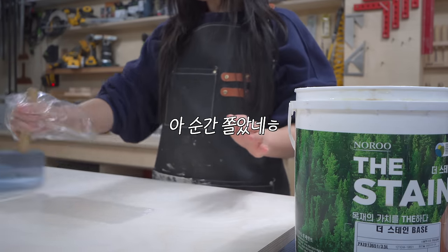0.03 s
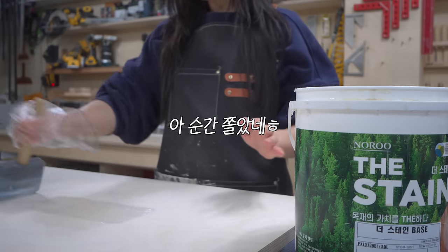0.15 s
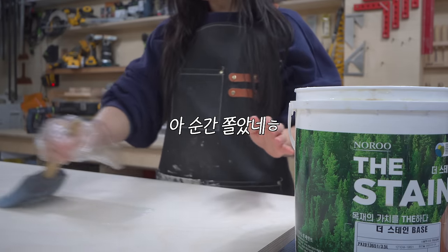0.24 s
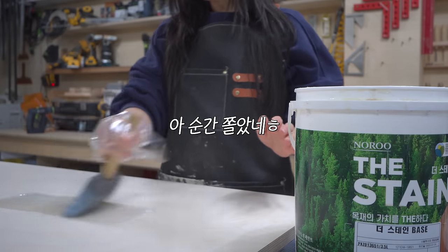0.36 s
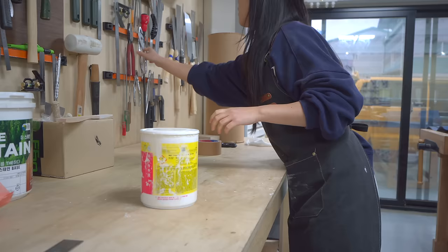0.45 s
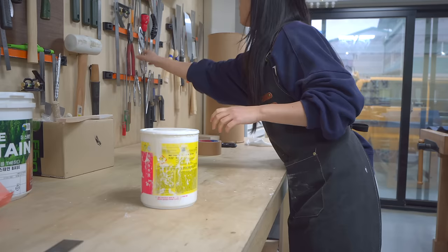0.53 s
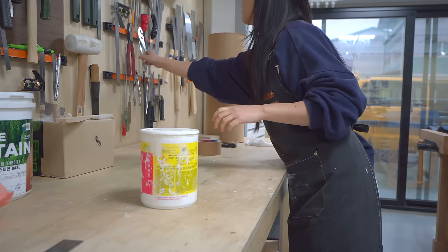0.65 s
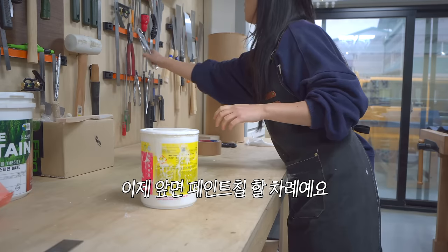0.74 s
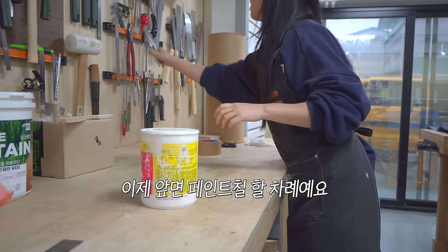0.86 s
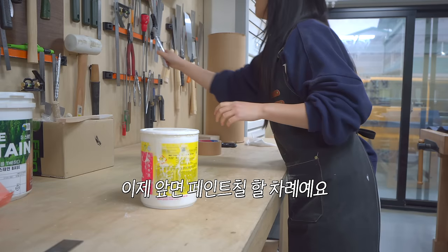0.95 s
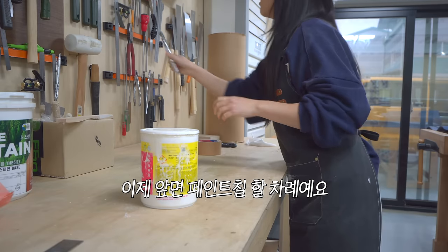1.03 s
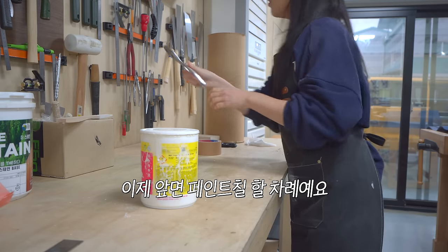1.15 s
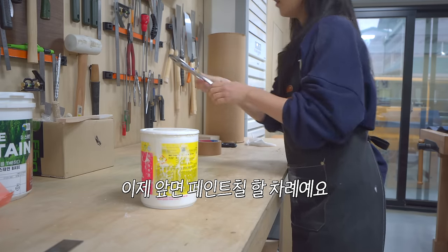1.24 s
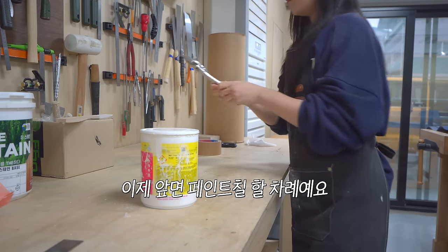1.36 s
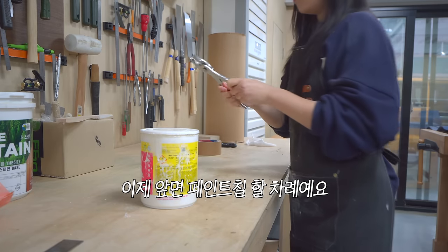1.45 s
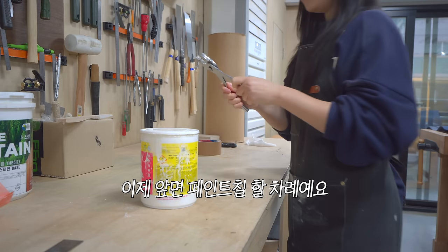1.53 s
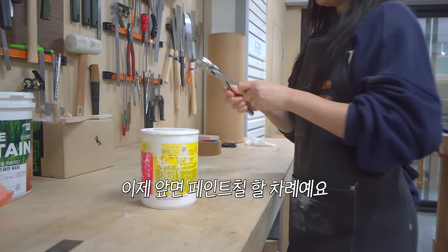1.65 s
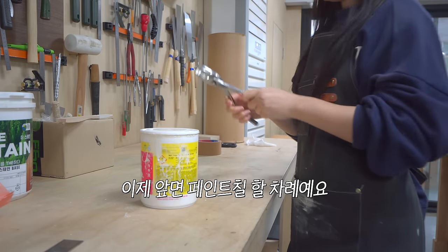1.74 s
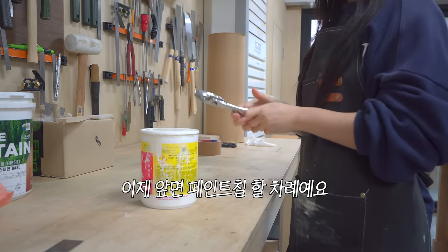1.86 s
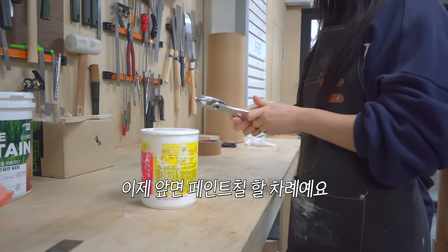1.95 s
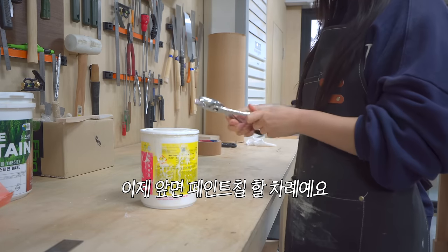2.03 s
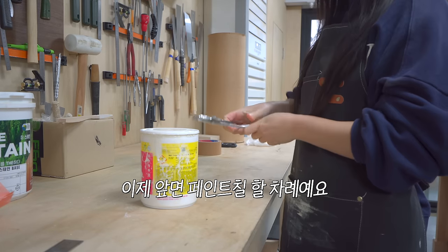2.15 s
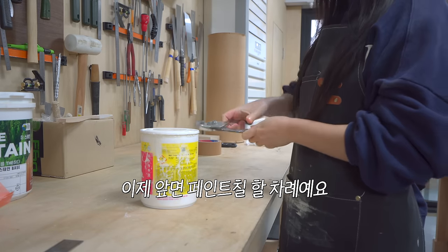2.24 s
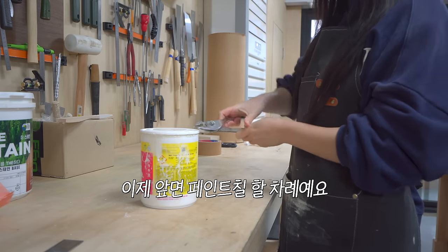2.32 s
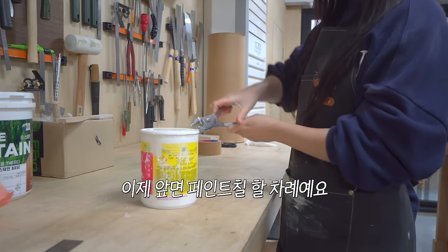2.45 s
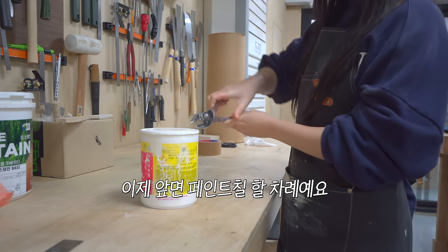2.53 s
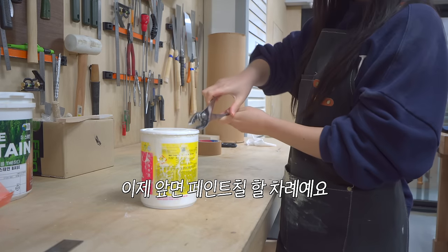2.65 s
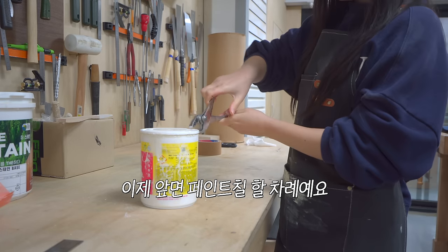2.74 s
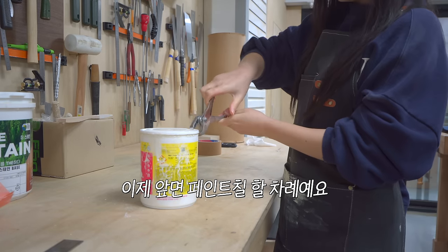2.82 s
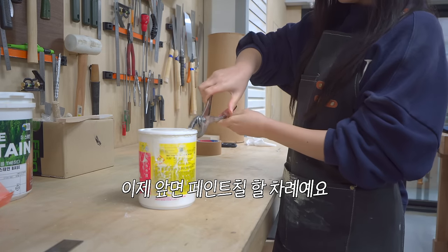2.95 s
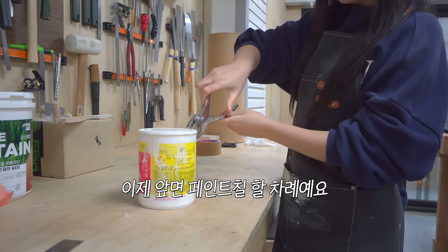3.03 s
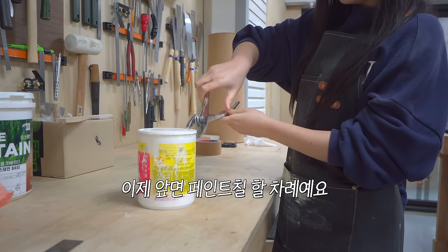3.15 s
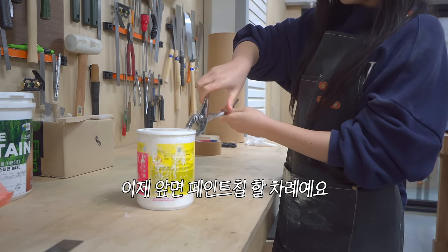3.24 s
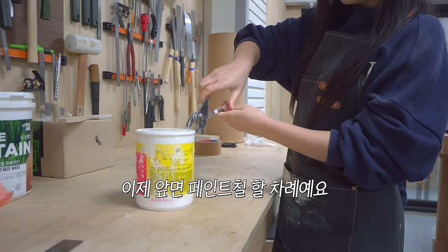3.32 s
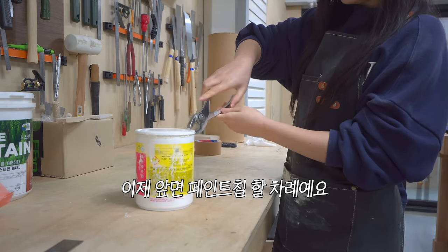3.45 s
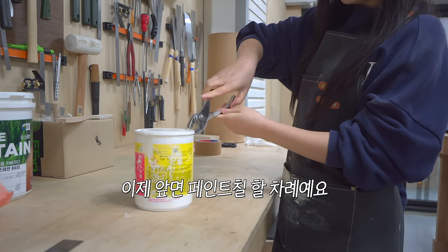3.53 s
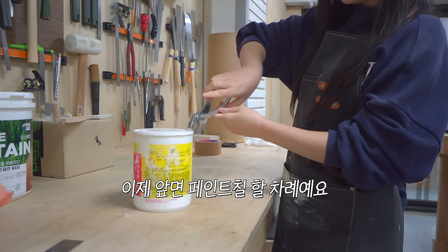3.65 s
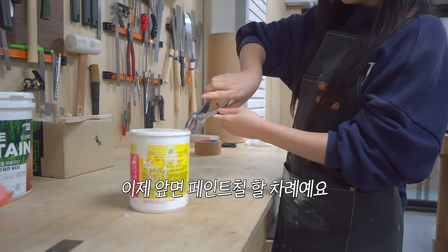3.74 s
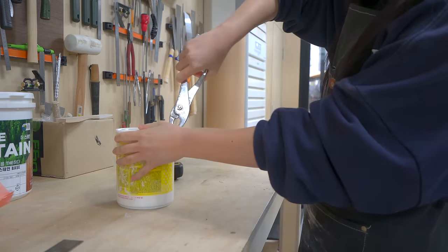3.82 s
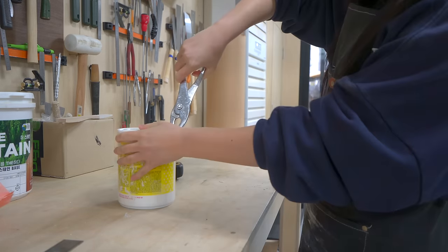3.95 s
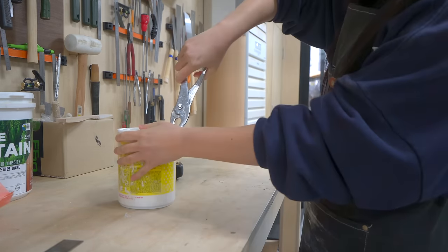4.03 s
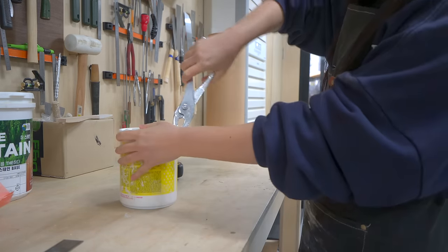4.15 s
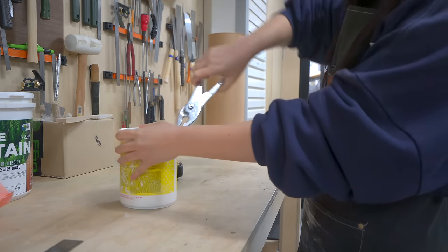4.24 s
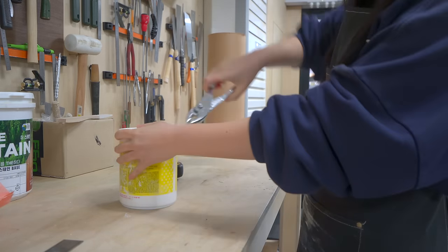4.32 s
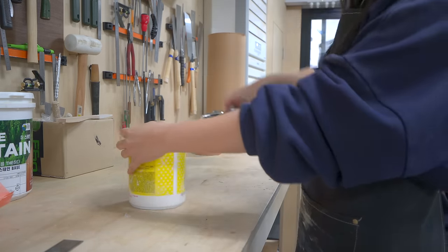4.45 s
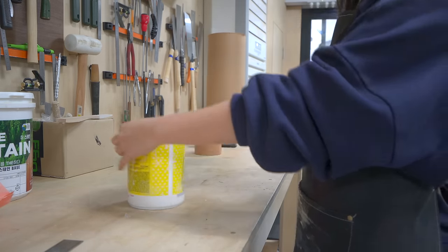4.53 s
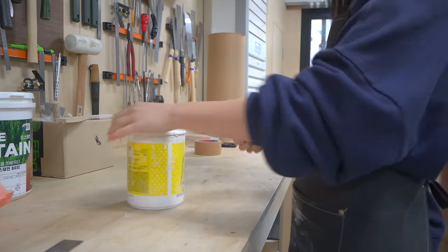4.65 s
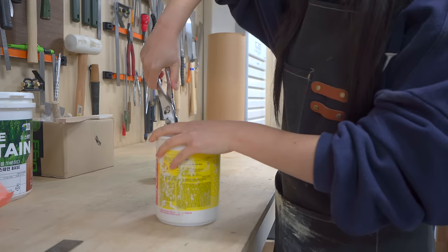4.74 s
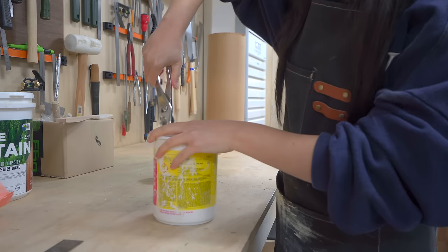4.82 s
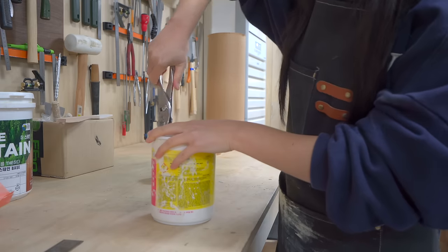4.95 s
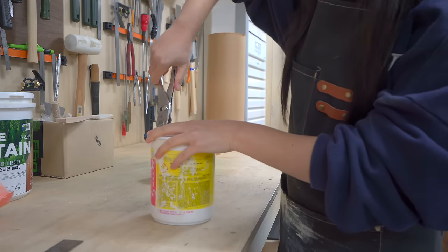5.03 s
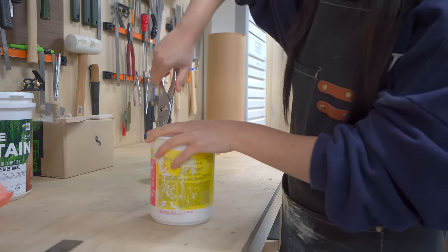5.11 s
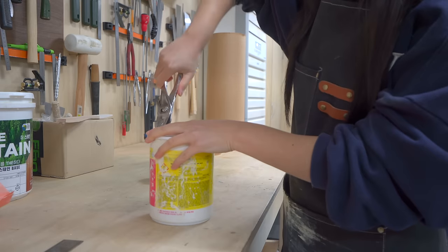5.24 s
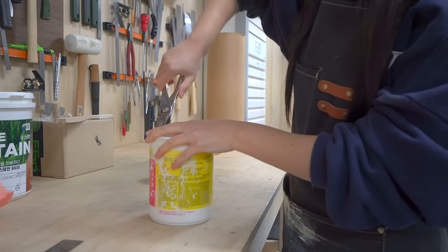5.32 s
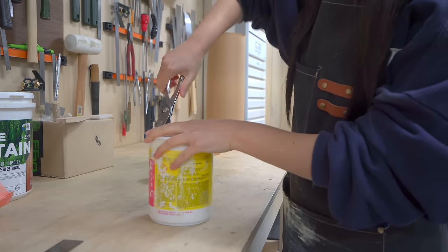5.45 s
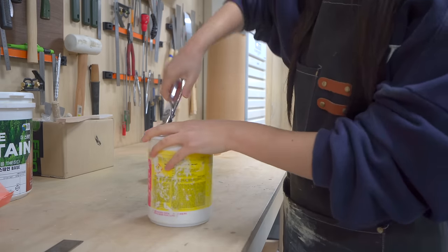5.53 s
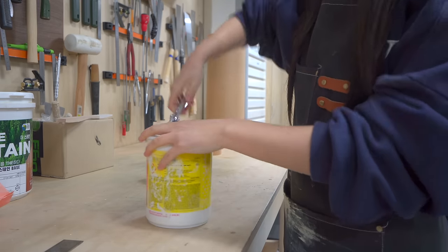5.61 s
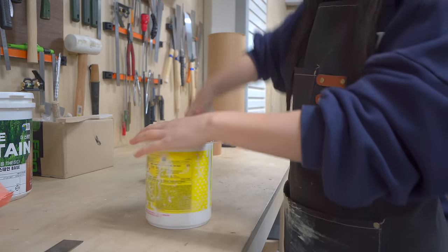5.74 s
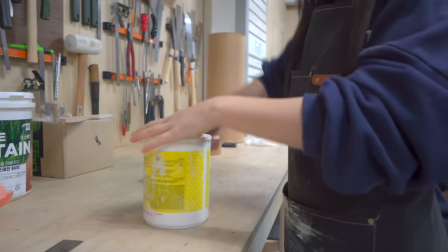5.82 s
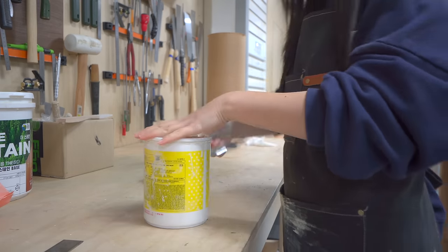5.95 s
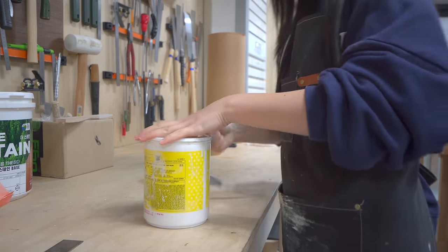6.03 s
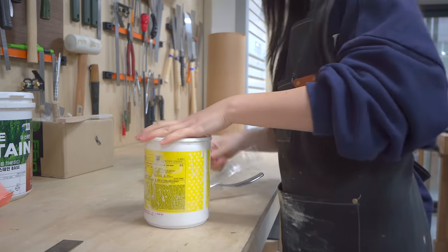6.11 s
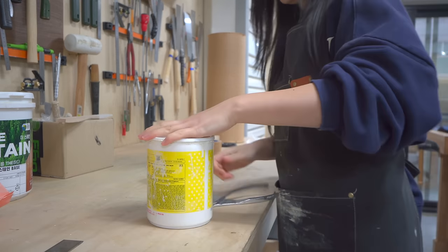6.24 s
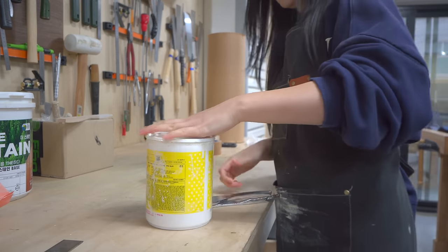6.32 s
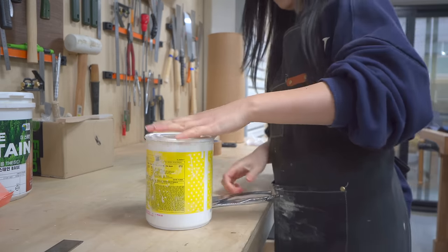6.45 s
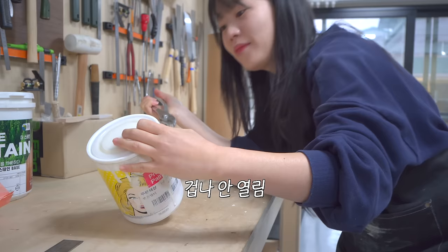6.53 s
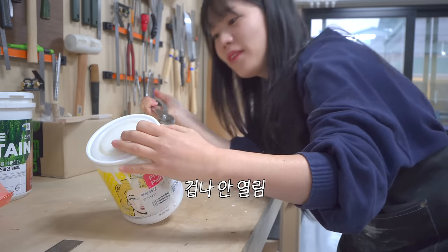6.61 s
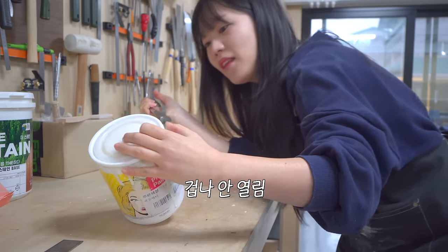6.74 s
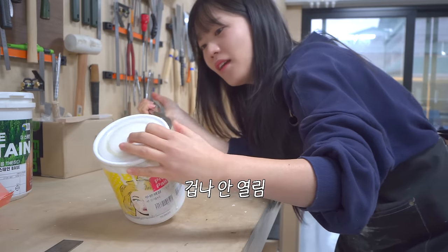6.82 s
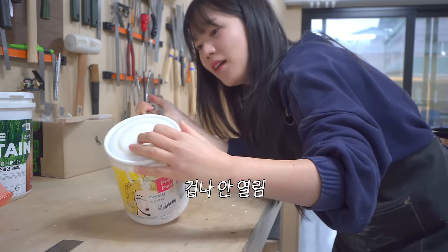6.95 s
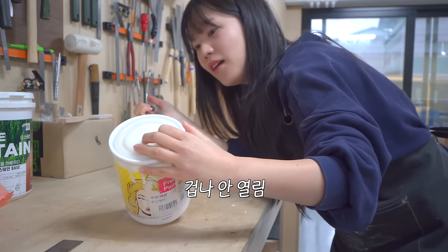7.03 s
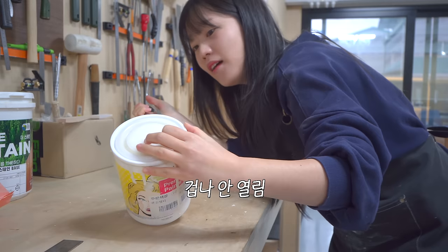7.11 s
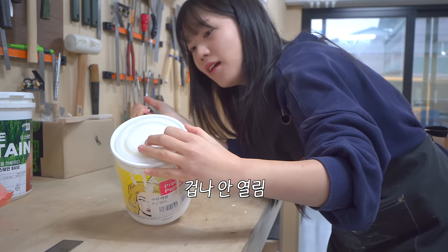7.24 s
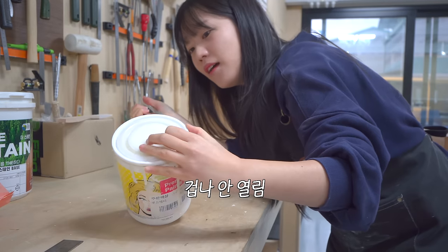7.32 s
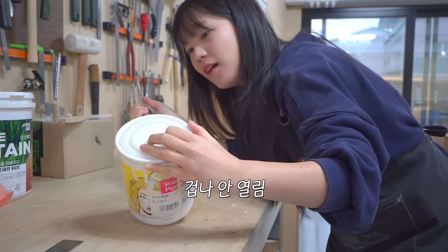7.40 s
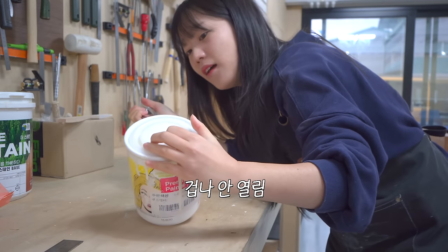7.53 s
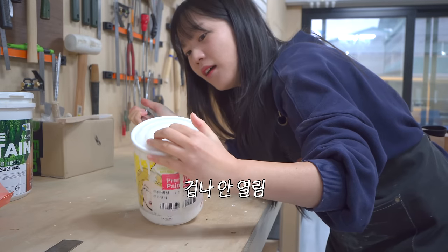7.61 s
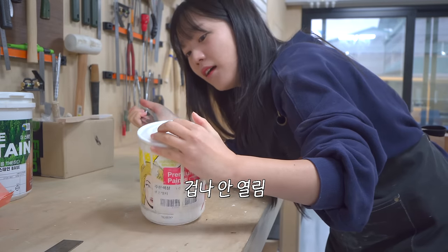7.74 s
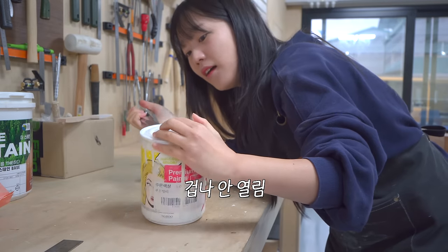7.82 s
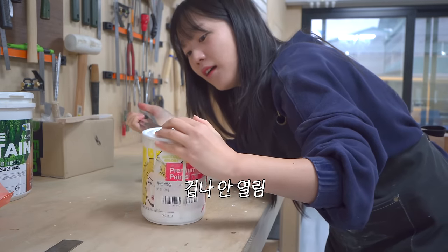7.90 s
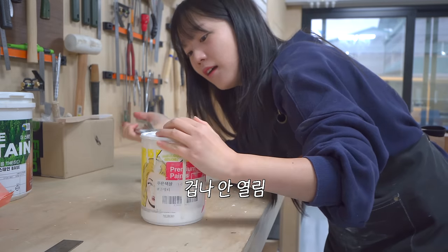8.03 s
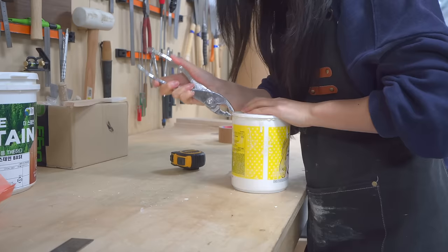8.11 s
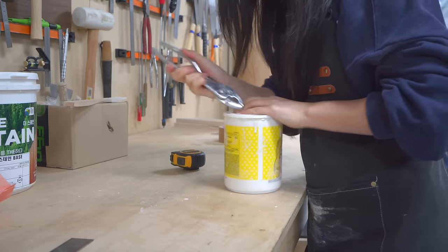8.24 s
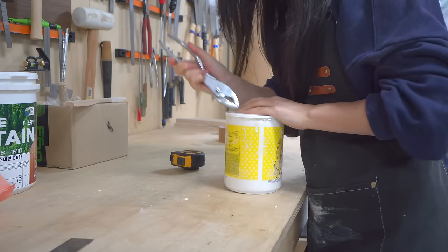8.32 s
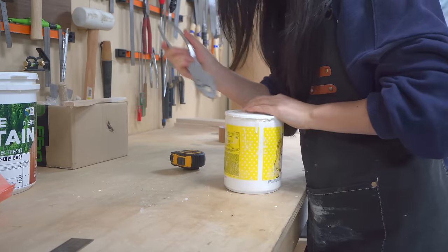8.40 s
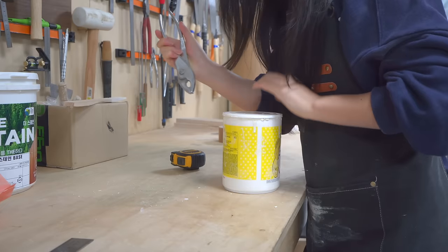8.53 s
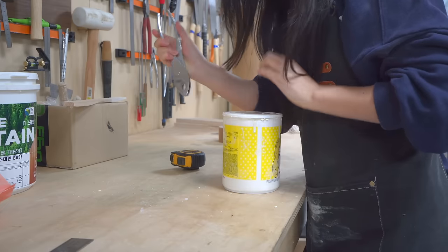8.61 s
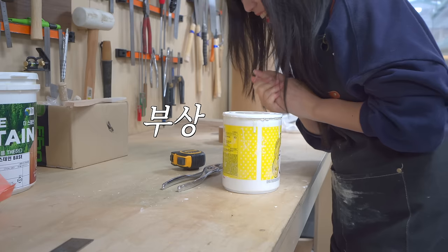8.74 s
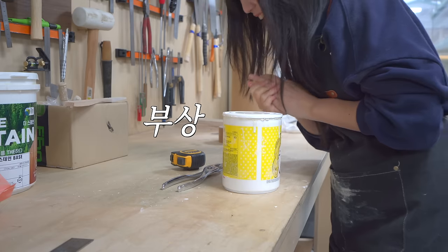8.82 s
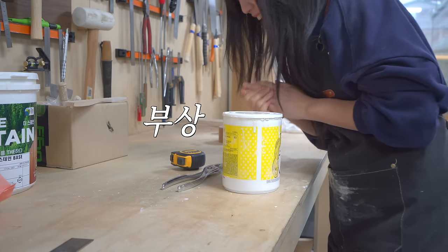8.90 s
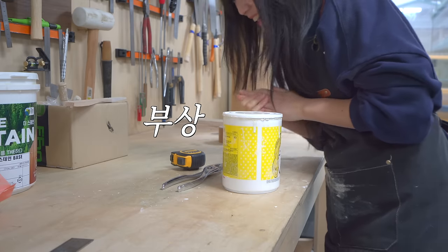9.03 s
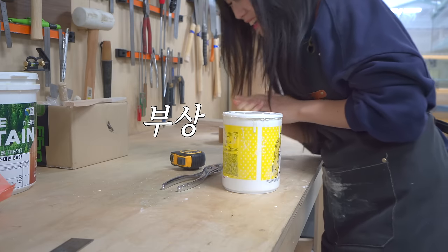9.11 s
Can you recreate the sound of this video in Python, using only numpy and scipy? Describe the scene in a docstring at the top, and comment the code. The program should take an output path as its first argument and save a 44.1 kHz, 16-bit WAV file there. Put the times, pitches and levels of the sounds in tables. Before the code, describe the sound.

Close, dry-edged sounds with lively room echo: a short brush stroke with crinkling plastic, dull bumps as pliers leave a wall rack, small steel clicks and soft cloth. Repeated woody knocks follow, then grating drags of the can, one sharp pop and a longer scrape. Pliers drop, bounce and slide with a bright shimmer that cuts off. Near silence, then a violent snap, thumping skid and a rough creak rising to a thin squeal.

```python
"""Pliers on a stuck paint can lid

A brush sweeps over a board in a thin plastic glove; then pliers are taken off a workshop wall.
Jaws clink, scrape and snap off the rim, the can knocks on the wooden bench, the pliers clatter down and slide.
After a last hard slip the can skids and thumps, and something creaks and squeaks.
Blows are ringing modes plus short noise; rubbing is many tiny slips; ventilation is coloured noise."""
import sys
import numpy as np
from scipy import signal
from scipy.fft import rfft, irfft, next_fast_len
from scipy.io import wavfile

SR = 44100
rng = np.random.default_rng(int(sys.argv[2]) if len(sys.argv) > 2 else 0)


def unload_wav(signal):
    """Save mono or channel-first audio to the path in sys.argv[1] as 16-bit WAV at rate SR, clipped to [-1, 1]."""
    wavfile.write(
        sys.argv[1],
        SR,
        np.round(np.clip(np.atleast_2d(signal).T, -1, 1) * 32767).astype(np.int16),
    )


N = 404397   # samples in the scene
TIME = np.arange(N) / SR
AGE = TIME[:SR]   # the first second after a blow [s]


def amp(db):
    """Turn decibels into gain."""
    return 10 ** (np.asarray(db) / 20)


def rms_one(x):
    """Scale a steady sound to unit rms."""
    return x / np.sqrt(np.mean(x ** 2) + 1e-20)


def attack_one(x):
    """Scale a blow to unit rms over its first fiftieth of a second."""
    return x / np.sqrt(np.mean(x[:SR // 50] ** 2) + 1e-20)


def at_hz(points, hz):
    """Read a table of (frequency, value) on a log-frequency axis."""
    table_hz, value = np.transpose(points)
    return np.interp(np.log(np.maximum(hz, 1)), np.log(table_hz), value)


def cut(x, hz, kind, order=2):
    """Butterworth filter: keep the low, the high or a band of the sound."""
    sections = signal.butter(order, np.clip(hz, 10, .45 * SR), kind, fs=SR, output="sos")
    return signal.sosfilt(sections, x + 1e-18)


def peak(x, hz, q):
    """Pass the sound through one resonance; a low q makes it broad."""
    b, a = signal.iirpeak(min(hz, SR / 3), max(q, .8), fs=SR)
    return signal.lfilter(b, a, x + 1e-18)


def colour(x, spectrum):
    """Give a sound a spectrum, read from a table of (frequency [Hz], level [dB])."""
    size = 2 * len(x)   # zero padding keeps the end from wrapping round to the start
    hz = np.arange(len(x) + 1) * SR / size
    return irfft(rfft(x, size) * amp(at_hz(spectrum, hz)))[:len(x)]


def burst(t60):
    """Noise that dies away: a crack, or modes too dense to tell apart."""
    age = AGE[AGE < 2 * max(t60, 1e-3)]
    noise = rng.standard_normal(SR)[:len(age)]
    return np.pad(noise * amp(-60 * age / t60), (0, SR - len(age)))


MODE_SPREAD_DB = 2.5   # how much each mode varies from blow to blow


def ring(modes):
    """Struck modes: decaying sines, each with a new strength and sign at every blow."""
    hz, db, t60 = np.transpose(modes)[:, :, None]
    age = AGE[:int(SR * t60.max()) + 2]
    strength = amp(db + MODE_SPREAD_DB * rng.standard_normal(db.shape))
    strength = strength * rng.choice([-1, 1], db.shape)
    decay = np.exp(-np.log(1000) * age / t60)
    sound = (strength * decay * np.sin(2 * np.pi * hz * age)).sum(0)
    return np.pad(sound, (0, SR - len(age)))


# how long the workshop echoes: (frequency [Hz], t60 [s])
ROOM_T60 = [(100, 0.66), (500, 0.59), (1500, 0.76), (4000, 0.86), (8000, 0.46), (15000, 0.39)]
# colour of that echo: (frequency [Hz], level [dB])
ROOM_COLOUR = [(60, 0), (130, 10), (400, 6), (1000, 3.5), (2500, -4.5), (6000, 1.5), (9000, -0.5),
               (15000, -5)]


def workshop():
    """Echo of the room: noise bands that build up in milliseconds, the top ones dying soonest."""
    edges = np.geomspace(50, 18000, 10)
    tail = np.zeros(SR)
    for low, high in zip(edges, edges[1:]):
        band = cut(rng.standard_normal(SR), [low, high], "band")
        tail += band * amp(-60 * AGE / at_hz(ROOM_T60, np.sqrt(low * high)))
    return colour(rms_one(tail) / np.sqrt(SR), ROOM_COLOUR) * (1 - np.exp(-AGE / 0.0031))


def in_room(x, room, room_db):
    """Direct sound plus its echo."""
    echo = signal.oaconvolve(x[:SR // 3], room)[:len(x)]
    return x + amp(room_db) * echo


# moments at which all ringing stops short: time [s]
STOPS = [0.485, 3.86, 6.567, 8.735]


def add(out, s, sound):
    """Place a sound at a time; it lasts until the next stop at most."""
    start = max(round(s * SR), 0)
    next_stops = [round(stop * SR) for stop in STOPS if stop > s]
    end = min([start + len(sound), N] + next_stops)
    out[start:end] += sound[:end - start]


SWELL_POWER = 1.63   # a stroke gathers strength as this power of time


def envelope(swell, hold, t60):
    """Age and gain of one stroke: it swells, holds and dies away."""
    age = np.arange(int(SR * (swell + hold + t60)) + 2) / SR
    rise = np.minimum(age / swell, 1) ** SWELL_POWER
    return age, rise * amp(-60 * np.maximum(age - swell - hold, 0) / t60)


def grains(size, per_s, spread_db):
    """Tiny slips at random moments, of uneven strength."""
    strength = amp(spread_db * np.minimum(rng.exponential(1, size), 4)) * rng.choice([-1, 1], size)
    return strength * (rng.random(size) < per_s / SR)


def strokes(rows, response, per_s, spread_db, echo_db, dulling_db_per_s=0, split_hz=2500):
    """Friction: slips and steady noise excite a response; body and hiss follow each stroke."""
    out, size = np.zeros(N), SR + len(response) - 1
    for s, swell, hold, t60, body_db, hiss_db in rows:
        age, gain = (values[:SR] for values in envelope(swell, hold, t60))
        # the noise is the smooth echo of the slips
        force = rms_one(grains(size, per_s, spread_db)) + amp(echo_db) * rng.standard_normal(size)
        rub = signal.fftconvolve(force, response, "valid")
        body = rms_one(cut(rub, split_hz, "low", order=4))[:len(age)]
        hiss = rms_one(cut(rub, split_hz, "high", order=4))[:len(age)]
        sinking_db = hiss_db - dulling_db_per_s * age
        add(out, s, gain * (body * amp(body_db) + hiss * amp(sinking_db)))
    return out


# resonances of the can on the bench: (frequency [Hz], level [dB], t60 [s])
BENCH = [(128.2, 7.5, 0.3), (244.2, 2.5, 0.31), (303.2, 0, 0.19), (365, 0.5, 0.22), (431, 0, 0.19),
         (483, -8, 0.21), (614, -5, 0.11), (710, -5, 0.166), (857, -5, 0.086), (920, -4.5, 0.2),
         (1018, -8, 0.44), (1042, -3, 0.34), (1186, -3, 0.071), (1390, -21, 0.225), (1490, -17, .15)]


def surface(spectrum, bench_db):
    """Response to one tiny slip: a click, lifted at the resonances of the can on the bench."""
    click = signal.unit_impulse(SR // 4, SR // 100)
    bench = np.zeros(len(click))
    for hz, db, t60 in BENCH:
        bench += amp(db) * peak(click, hz, q=hz * t60 * np.pi / np.log(1000))
    return colour(click + amp(bench_db) * bench, spectrum)


# colour of the room air: (frequency [Hz], level [dB])
AIR_COLOUR = [(15, -26.5), (25, -11), (64, 0.5), (97, -11), (120, -4.5), (185, -7), (223, -7), (285, -7.5),
              (463, -13), (516, -11.5), (560, -11.5), (695, -16), (1070, -17), (13600, -38.5), (16000, -39)]
# course of the room air, before the trim below: (time [s], level [dB])
AIR = [(0, -38.5), (2.8, -37.5), (6.5, -40.5), (6.8, -39.5), (8.0, -40.5), (9.17, -32.5)]
AIR_TRIM_DB = -4.5


def air():
    """Ventilation: coloured noise with one soft duct resonance, at a slowly changing level."""
    white = rng.standard_normal(next_fast_len(N))
    hum = rms_one(peak(white, 742, q=8))
    blend = (rms_one(colour(white, AIR_COLOUR)) + amp(-4) * hum)[:N]
    return blend * amp(np.interp(TIME, *np.transpose(AIR)) + AIR_TRIM_DB)


# colour of the bristles: (frequency [Hz], level [dB])
BRUSH_COLOUR = [(59, -39), (100, 1), (215, -19), (283, 1.5), (365, -6), (502, 2.5), (818, -7.5), (991, -3),
                (3620, -17), (8110, -11.5), (10900, -22), (13200, -17), (16000, -28)]
# sweeps of the brush: (time [s], swell [s], hold [s], fade t60 [s], body [dB], hiss [dB])
BRUSH_SWEEPS = [(0.0, 0.0018, .11, .4, -34, -32.5), (0.13, 0.13, .03, 1.1, -36, -33),
                (0.37, 0.085, .02, .5, -39, -36)]


def brush():
    """Bristles catch and slip on the board."""
    return strokes(BRUSH_SWEEPS, surface(BRUSH_COLOUR, -17), per_s=1200, spread_db=4.5, echo_db=1)


# the loudest crinkles of a thin plastic glove: (time [s], peak level [dB])
CRINKLES = [(0.0436, -1.5), (0.048, -13), (0.1987, -13), (0.2198, -12), (0.2844, -19), (0.2912, -13)]
# fainter ones fall at random while the brush moves: for how long, their middle level and its spread
BRUSHING_S, CRINKLE_DB, CRINKLE_SPREAD_DB = .36, -21.5, 2.5


def glove(room, count=8):
    """Creases of the plastic flip with very short, bright snaps."""
    out = np.zeros(N)
    faint = []
    for _ in range(count):
        faint.append((BRUSHING_S * rng.random(), CRINKLE_DB + CRINKLE_SPREAD_DB * rng.standard_normal()))
    for s, db in CRINKLES + faint:
        snap = peak(burst(0.0035), 7700, q=2.7)
        add(out, s, amp(db) * in_room(snap / np.abs(snap).max(), room, -17))
    return out


# modes of the tool board: (frequency [Hz], level [dB], t60 [s])
BOARD = [(154, -3.5, 0.27), (251, -10.5, 0.17), (372, -3.5, 0.13), (448, 1, 0.09), (928, 3, 0.068),
         (1038, -10, 0.089), (1410, -2, 0.1), (1610, -2, 0.05), (1760, 0, 0.085), (2000, -12, 0.045)]
# tools bump the wall: (time [s], level [dB], brightest frequency [Hz], tick [dB])
BUMPS = [(0.518, -37.5, 1500, -10), (0.633, -22.5, 1980, -8), (0.655, -26.5, 1790, -5),
         (0.7447, -21.5, 1150, -19), (0.851, -31.5, 3500, -11.5), (1.204, -36, 1800, -5)]


def bumps(room):
    """A hanging tool swings against the board: a tick, and the board's modes up to what the contact reaches."""
    out = np.zeros(N)
    for s, db, hz, tick_db in BUMPS:
        tick = attack_one(cut(cut(burst(0.074), 1800, "low", order=1), 6500, "low"))
        dense = attack_one(cut(burst(0.12), 2040, "low", order=4))
        board = attack_one(ring(BOARD)) + amp(-0.5) * dense
        reached = cut(cut(board, hz, "low"), 0.17 * hz, "high", order=1)
        blow = attack_one(reached) * (1 - np.exp(-AGE / 0.0011))
        add(out, s, amp(db) * in_room(blow + amp(tick_db) * tick, room, -9))
    return out


# modes of the pliers gripped shut, ringing as one piece: (frequency [Hz], level [dB])
GRIPPED = [(2300, -17), (3000, -8), (3413, 1), (3915, -4), (5566, -4), (6374, -5), (6821, -13), (7100, -3),
           (7402, -5), (7900, 1), (8150, -7), (8500, -2), (8979, -11), (9685, -26.5), (10440, -11),
           (11200, -12), (12200, -13), (13090, -7), (13900, -12)]
# modes of the pliers lying loose: (frequency [Hz], level [dB])
STEEL = [(3467, -48), (3585, -44), (3903, -40), (4237, -51), (5572, -43), (6153, -44), (6428, -45),
         (6901, -43), (7526, -41), (8204, -57), (8969, -43), (9345, -50), (9803, -50), (10444, -49),
         (10648, -45), (11429, -49), (12360, -50), (13081, -47), (13814, -47), (14013, -52), (14664, -65),
         (15084, -55)]
# steel touches: (time [s], level [dB], brightest note [Hz], ring t60 [s])
CLINKS = [(0.633, -36.5, 10000, 0.019), (0.652, -40, 9100, 0.035), (1.436, -43, 4860, .04),
          (1.473, -31.5, 5660, 0.042), (1.529, -21.5, 5660, 0.03), (1.646, -42.5, 4000, 0.02),
          (1.845, -42, 8760, 0.25), (1.96, -29, 8250, 0.028), (3.079, -29.5, 7200, 0.023),
          (4.232, -42, 5060, 0.034), (4.499, -31, 6050, 0.042), (4.627, -39.5, 8470, 0.035),
          (5.438, -30, 5320, 0.014), (5.903, -12.5, 7800, 0.038), (5.997, -26.5, 9500, 0.056),
          (6.019, -19, 10200, 0.12), (6.203, -27, 8000, 0.19), (6.219, -24.5, 7100, 0.12),
          (6.368, -26.5, 9000, 0.13), (8.239, -14, 8340, 0.036), (9.02, -40, 9400, .04)]
LET_GO_S, PICKED_UP_S = 5.95, 6.6   # the pliers lie loose between these times
JAW_RING_DB, BOUNCE_DB, CLINK_ROOM_DB = -5.5, -7.5, -9


def clinks(room):
    """Steel on steel: a tick, a bounce and ringing modes; in the hand the jaws add a note set by their opening."""
    out = np.zeros(N)
    for s, db, hz, t60 in CLINKS:
        loose = LET_GO_S < s < PICKED_UP_S
        modes = STEEL if loose else GRIPPED
        steel = attack_one(ring([(mode_hz, level, t60) for mode_hz, level in modes]))
        crack = burst(0.067) + 1.8 * burst(0.0016)
        tick = attack_one(cut(cut(crack, 1300, "high"), 10800, "low"))
        if loose:
            contact = steel + amp(0.5) * tick
        else:
            jaws = attack_one(peak(peak(burst(t60), hz, q=15), hz, q=15))
            contact = steel + amp(-3) * tick + amp(JAW_RING_DB) * jaws
        delay = int(SR * rng.uniform(.002, .006))
        bounce = amp(BOUNCE_DB) * np.pad(contact, (delay, 0))[:SR]
        clink = attack_one(peak(contact + bounce, hz, q=0.8))
        add(out, s, amp(db) * in_room(clink, room, CLINK_ROOM_DB))
    return out


# colour of the cloth: (frequency [Hz], level [dB])
SLEEVE_COLOUR = [(59, -26), (100, -4), (177, -33), (266, -6), (322, -18), (373, -6), (991, -5.5),
                 (8110, -12), (16000, -30)]
# rustles of the sleeves: (time [s], swell [s], hold [s], fade t60 [s], body [dB], hiss [dB])
RUSTLES = [(0.97, 0.23, .13, 0.45, -41.5, -50.5), (1.22, .16, .3, 0.37, -49, -49),
           (1.93, 0.077, 0.038, .6, -42.5, -44), (2.15, 0.16, .2, 0.93, -47.5, -49.5),
           (7.40, 0.011, 0.098, .12, -81, -49.5), (7.53, .05, 0.096, .3, -76, -53.5),
           (7.98, 0.19, .03, .1, -46, -60)]


def sleeves():
    """Cloth rubs in a dense crowd of very uneven slips."""
    return strokes(RUSTLES, surface(SLEEVE_COLOUR, -1.6), per_s=2000, spread_db=7.5, echo_db=7.0)


def thud(hz, q, push_db, dense_db, dense_t60, top_hz):
    """A short push, then can and bench ring together; the contact picks out the range around one pitch."""
    push = attack_one(cut(signal.unit_impulse(SR), top_hz, "low", order=4))
    dense = attack_one(cut(burst(dense_t60), top_hz, "low", order=4))
    modes = attack_one(ring(BENCH) * amp(-60 * AGE / 0.21))   # the hand damps the can
    wood = modes + amp(push_db) * push + amp(dense_db) * dense
    return attack_one(cut(peak(wood, hz, q), 133, "high"))


# can and pliers knock on the bench: (time [s], level [dB], centre of the thud [Hz], tick [dB])
KNOCKS = [(2.283, -33, 504, -14), (2.864, -12.5, 600, -18), (3.077, -16.5, 317, -13.5),
          (3.307, -21.5, 320, -18.5), (3.352, -21, 397, -12), (3.502, -13, 645, -16),
          (3.701, -26, 740, -12), (3.765, -28, 175, -28.5), (6.085, -15.5, 706, -3),
          (6.117, -20, 2270, -11), (6.237, -20, 2300, -19), (6.344, -19.5, 2080, -17),
          (7.412, -45.5, 156, -13), (8.329, -12, 630, -35), (8.526, -18.5, 347, -18),
          (8.561, -10, 760, -45)]
KNOCK_ROOM_DB, REBOUND_DB = -9.5, -12.5
BOOM_HZ, BOOM_DB = 325, -6   # the can's own drum note sounds under every knock
HARD_LOSS_DB_PER_OCTAVE = 8   # hard contacts, centred above 700 Hz, stir that note less


def knocks(room):
    """The can rocks and the pliers bounce: a thud with a dry tick and a drum note; the thud rebounds softly."""
    out = np.zeros(N)
    low_modes = [mode for mode in BENCH if mode[0] < 340]
    for s, db, hz, tick_db in KNOCKS:
        tick = attack_one(cut(cut(burst(0.053), 1530, "low", order=1), 5600, "low"))
        blow = thud(hz, q=1.86, push_db=-5, dense_db=-2.5, dense_t60=0.094, top_hz=800 + 0.65 * hz)
        boom = attack_one(peak(ring(low_modes), BOOM_HZ, q=4.6) * amp(-60 * AGE / 0.24))
        boom_db = BOOM_DB - HARD_LOSS_DB_PER_OCTAVE * max(np.log2(hz / 700), 0)
        delay = int(SR * rng.uniform(.012, .024))
        rebound = amp(REBOUND_DB) * np.pad(blow, (delay, 0))[:SR]
        knock = blow + rebound + amp(tick_db) * tick + amp(boom_db) * boom
        add(out, s, amp(db) * in_room(knock, room, KNOCK_ROOM_DB))
    return out


# colour of steel on the tin: (frequency [Hz], level [dB])
SCRAPE_COLOUR = [(47, -61), (80, -25), (130, -2.5), (271, -8), (309, -3), (346, -7.5), (563, -7),
                 (896, -7.5), (980, -10.5), (1200, -11), (3170, -31), (6740, -38), (16000, -56)]


def tin():
    """Response of the can to one tiny slip."""
    return surface(SCRAPE_COLOUR, 0.87)


# scrapes of the jaws on the rim: (time [s], swell [s], hold [s], fade t60 [s], body [dB], hiss [dB])
SCRAPES = [(3.12, 0.2, .02, .35, -35, -52), (3.53, 0.18, .02, .35, -32.5, -46.5),
           (3.72, 0.062, 0.023, 1, -27.5, -38.5), (4.812, 0.0099, 0.0088, 0.025, -30, -43),
           (5.08, 0.13, 0.0072, .8, -32, -63), (5.44, 0.22, .01, .55, -23, -33),
           (5.62, 0.14, 0.17, .35, -28.5, -42), (8.216, 0.0038, 0.016, .03, -33.5, -48)]


def scraping_jaws():
    """The jaws catch and slip along the rim."""
    return strokes(SCRAPES, tin(), per_s=1000, spread_db=3.0, echo_db=2)


# the can is dragged round: (time [s], swell [s], hold [s], fade t60 [s], body [dB], hiss [dB])
TURNS = [(3.87, 0.034, 0.018, 0.38, -27, -41.5), (3.99, 0.22, .01, 1, -34.5, -48),
         (4.37, 0.091, 0.038, 0.58, -17, -32)]
HELD_CUT_HZ = 183   # the hand stills the can's lowest modes


def turning_can():
    """The can, held down by a hand, catches and slips as it is dragged round on the bench."""
    return strokes(TURNS, cut(tin(), HELD_CUT_HZ, "high"), per_s=1000, spread_db=3.0, echo_db=3.5)


# the rim clicks under load, or the jaws snap off it:
# (time [s], level [dB], centre of the lid's pop [Hz], crack [dB], room [dB])
SNAPS = [(4.838, -9.5, 905, -9.5, 1.5), (5.416, -43, 1500, -7, -14), (5.433, -39, 1500, -3, -5),
         (5.439, -28.5, 1240, -11, -10), (7.074, -51, 2500, 15, -11), (8.2342, -13, 1070, -1, -9.5)]


def snaps(room):
    """The rim springs free: one sharp pulse, a pop of the lid with a bright crack, fills the room."""
    out, pulse = np.zeros(N), signal.unit_impulse(SR)
    for s, db, hz, crack_db, room_db in SNAPS:
        spring = pulse + amp(-20 + room_db) * burst(0.035)   # the bench scatters part of it at once
        wet = spring + amp(room_db + 3) * signal.fftconvolve(pulse, room)[:SR]
        crack = attack_one(cut(cut(wet, 6000, "low"), 950, "high", order=1))
        pop = attack_one(cut(peak(wet, hz, q=0.65), 3550, "low"))
        add(out, s, amp(db) * (pop + amp(crack_db) * crack))
    return out


# colour of the pliers on the bench: (frequency [Hz], level [dB])
SLIDE_COLOUR = [(59, -48), (100, -19.5), (266, -20), (302, -8.5), (608, -5), (768, -7.5), (1030, -2),
                (4020, -12.5), (5080, -14), (6700, -13), (7940, -23), (13500, -24), (16000, -46)]
# the pliers slide: (time [s], swell [s], hold [s], fade t60 [s], body [dB], hiss [dB])
SLIDES = [(6.075, 0.12, 0.56, .1, -17, -31)]


def sliding_pliers():
    """The pliers slide over the bench in fewer, almost equal slips."""
    return strokes(SLIDES, surface(SLIDE_COLOUR, 3.8), per_s=350, spread_db=0.5, echo_db=2.0)


# the sliding pliers sing in bouts:
# (time [s], swell [s], hold [s], fade t60 [s], lower modes [dB], upper modes at the start [dB])
CHATTERS = [(6.08, 0.066, 0.043, 0.32, -49, -15), (6.24, 0.022, .3, .1, -31, -22)]
SETTLING_DB_PER_S = 90   # the upper modes drop out as the steel settles


def singing_steel():
    """The loose pliers chatter as they slide, which keeps all their modes ringing."""
    steel = ring([(hz, db, .13) for hz, db in STEEL])
    return strokes(CHATTERS, steel, per_s=170, spread_db=1.0, echo_db=-6,
                   dulling_db_per_s=SETTLING_DB_PER_S, split_hz=6100)


# colour of the skidding can: (frequency [Hz], level [dB])
SKID_COLOUR = [(35, -29), (60, -15), (118, -6), (274, -10.5), (354, 1), (503, -7.5), (593, -1), (651, -7),
               (767, -6.5), (1820, -27), (3190, -28), (5720, -20.5), (7060, -31), (8320, -26), (16000, -54)]
# the can skids, then runs out: (time [s], swell [s], hold [s], fade t60 [s], body [dB], hiss [dB])
SKIDS = [(8.235, .04, 0.044, 0.091, -12, -20.5), (8.31, 0.044, 0.011, 0.73, -14, -28.5)]


def skidding_can():
    """The can slides over the bench in a dense run of slips."""
    return strokes(SKIDS, surface(SKID_COLOUR, -1.3), per_s=1900, spread_db=4.0, echo_db=3)


# resonances of what creaks: (frequency [Hz], level [dB], t60 [s])
CREAKER = [(1150, -7.5, 0.0098), (1510, 0, 0.013), (1700, -6, .012), (1890, -1, 0.03), (2180, -14.5, 0.025),
           (3630, -6.5, 0.012), (3850, -2.5, 0.0058), (4280, -5.5, 0.0069), (5750, -21, 0.013),
           (6730, -21, .006), (8240, -20.5, 0.014), (9050, -28, 0.0076), (12100, -31, 0.0065)]
# creaks, each a run of slips:
# (time [s], length [s], first slip [dB], last slip [dB], sharpness of the first [Hz])
CREAKS = [(8.830, .078, -15, -7, 1790), (8.980, .024, -13, -16, 3800)]
SLIP_GAP_S = .0142
SHARPER_HZ_PER_DB = 170   # a harder slip is also sharper


def creak(room):
    """Stick and slip: separate slips in a run each ring a few modes."""
    out = np.zeros(N)
    for start, length, first_db, last_db, first_hz in CREAKS:
        times = np.arange(start, start + length, SLIP_GAP_S)
        levels = np.linspace(first_db, last_db, len(times))
        for s, db in zip(times, levels):
            hz = max(first_hz + SHARPER_HZ_PER_DB * (db - first_db), 500)
            swell = 1 - np.exp(-AGE * hz / 4)   # soft slips swell more slowly
            slip = cut(ring(CREAKER), 2.2 * hz, "low") * swell
            jitter = rng.uniform(-1, 1) * SLIP_GAP_S / 20
            add(out, s + jitter, amp(db) * in_room(slip / np.abs(slip).max(), room, -7.5))
    return out


# the creak runs on in squeaks:
# (time [s], swell [s], hold [s], fade t60 [s], low resonances [dB], high resonances [dB])
SQUEAKS = [(8.898, 0.0021, .004, .2, -18.5, -32), (8.975, 0.0064, .005, .25, -28.5, -33.5),
           (9.07, 0.03, .07, .1, -39, -34.5)]


def squeaks():
    """The slips crowd into rough squeaks, which damp the creaking modes."""
    pulse = signal.unit_impulse(SR // 20)
    damped = np.zeros(len(pulse))
    for k, (hz, db, t60) in enumerate(CREAKER):
        # alternating signs; this q is under half that of the free ring
        damped += (-1) ** k * amp(db) * peak(pulse, hz, q=hz * t60 * 0.2)
    return strokes(SQUEAKS, damped, per_s=1500, spread_db=3.5, echo_db=-2)


# the last squeak rises to a rough squeal
SQUEAL_AT_S, SQUEAL_SWELL_S, SQUEAL_DB = 9.078, 0.017, -35.5
SQUEAL_HZ, SQUEAL_RISE_HZ_PER_S = 4100, 4600


def squeal():
    """Slips so fast that they fuse into an unsteady, rising tone with a weak octave."""
    out = np.zeros(N)
    age, gain = envelope(SQUEAL_SWELL_S, hold=.08, t60=.05)
    wobble, flutter = (rms_one(cut(rng.standard_normal(SR), 400, "low"))[:len(age)] for _ in range(2))
    pitch = (SQUEAL_HZ + SQUEAL_RISE_HZ_PER_S * age) * (1 + 0.034 * wobble)
    phase = 2 * np.pi * np.cumsum(pitch) / SR
    tone = np.sin(phase) + amp(-10) * np.sin(2 * phase)
    add(out, SQUEAL_AT_S, gain * amp(SQUEAL_DB + 3.3 * flutter) * tone)
    return out


def scene():
    """Add up all sources; blows, crinkles and creaks share one room echo."""
    room = workshop()
    blows = bumps(room) + clinks(room) + knocks(room) + snaps(room)
    rubbing = brush() + sleeves() + scraping_jaws() + turning_can() + sliding_pliers() + skidding_can()
    creaking = creak(room) + squeaks() + squeal()
    return (air() + glove(room) + blows + rubbing + singing_steel() + creaking)[None]


CUTOFF_HZ = 16000


def record(dry):
    """The loudest peaks are rounded, the top is cut."""
    rounded = 1.053 * np.tanh(dry / 1.102)
    return signal.sosfilt(signal.ellip(10, .2, 70, CUTOFF_HZ, fs=SR, output="sos"), rounded)


dry = scene()
out = record(dry)
unload_wav(out)
```